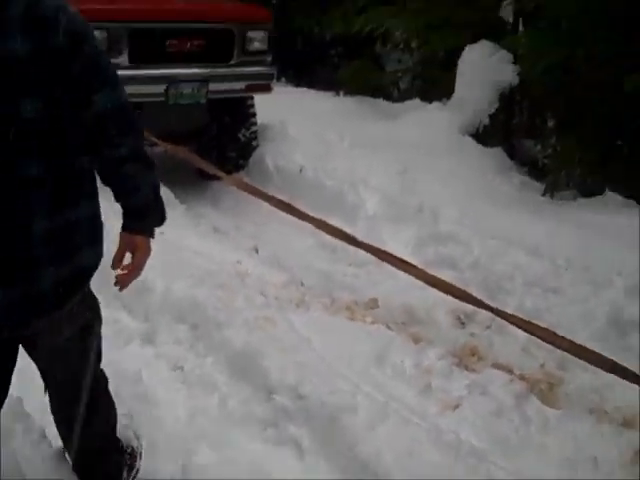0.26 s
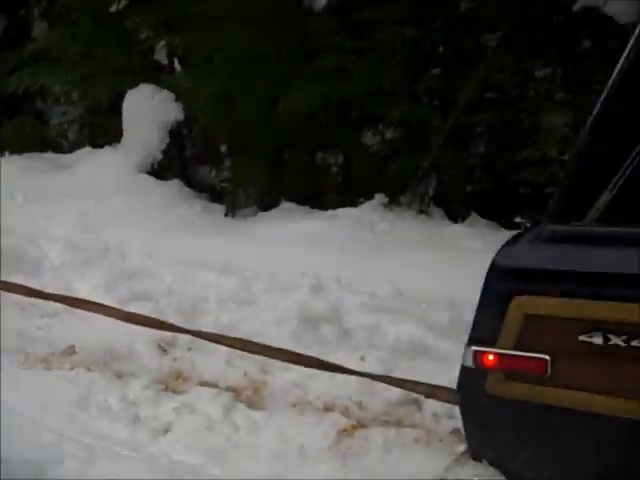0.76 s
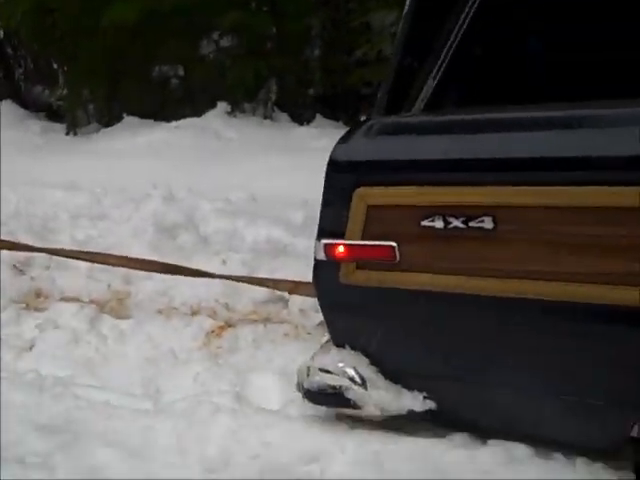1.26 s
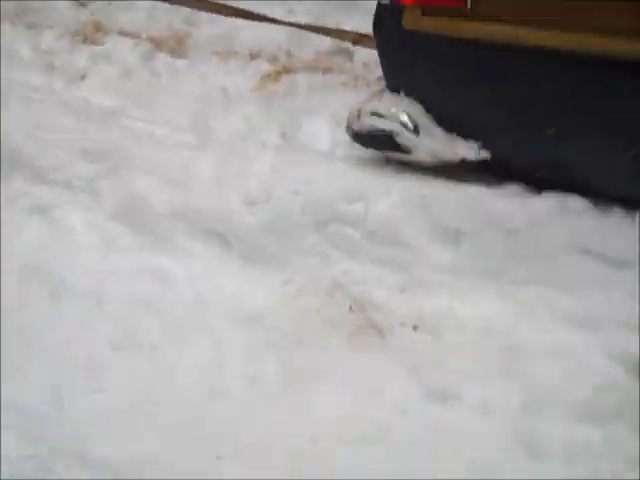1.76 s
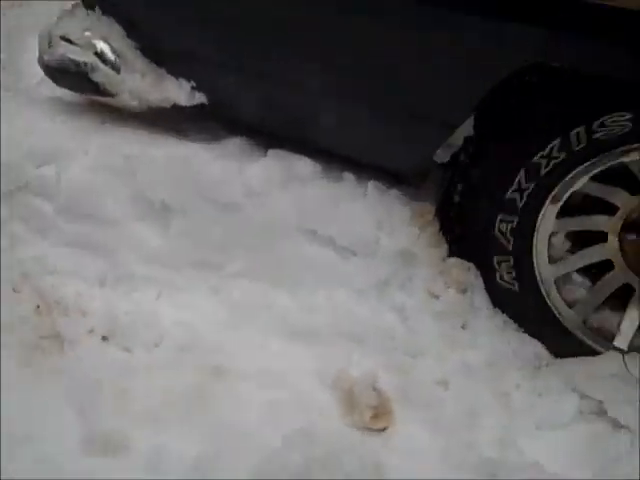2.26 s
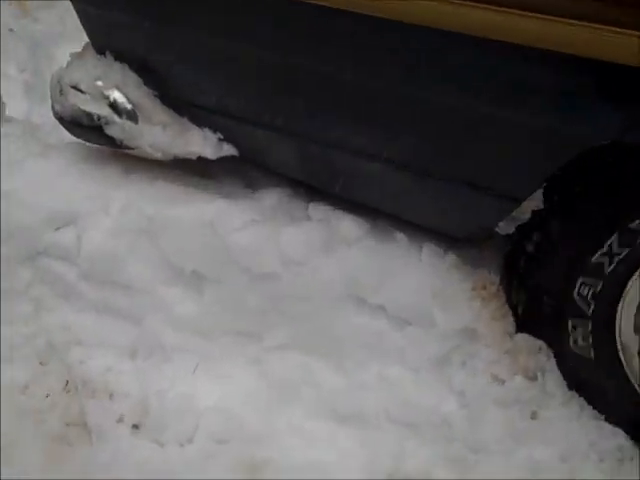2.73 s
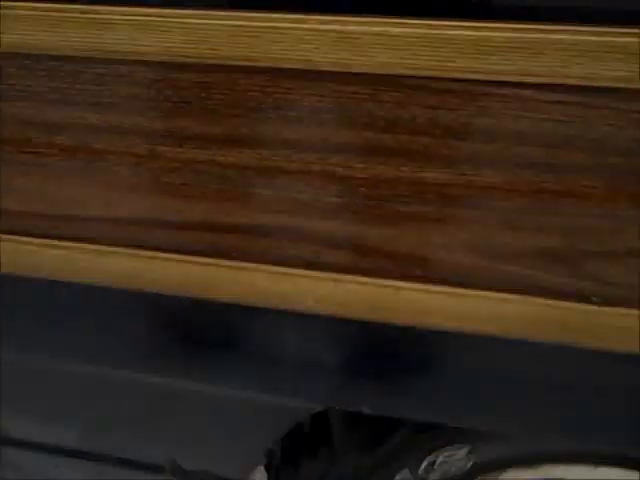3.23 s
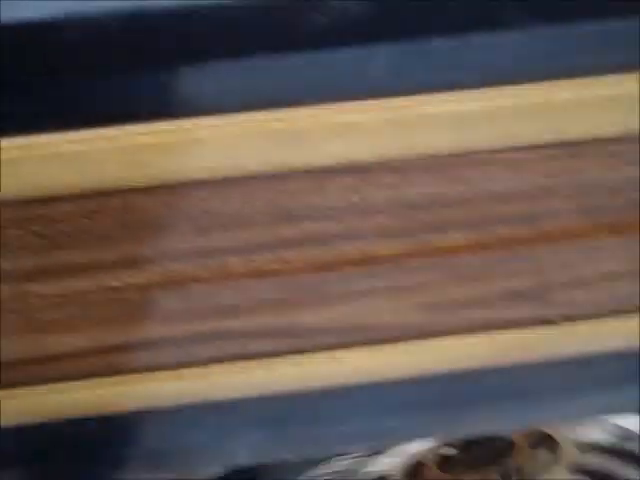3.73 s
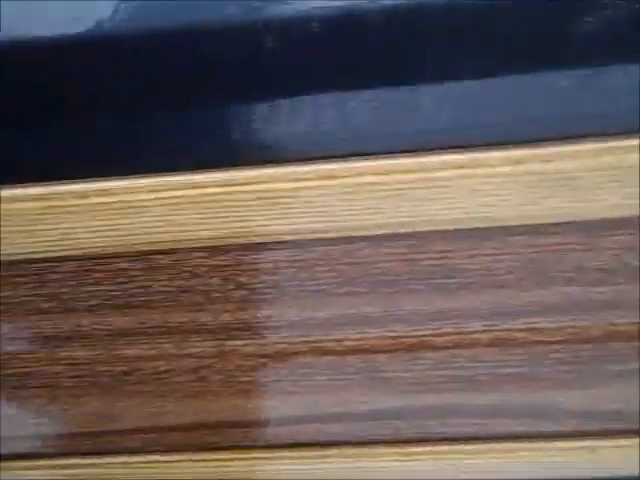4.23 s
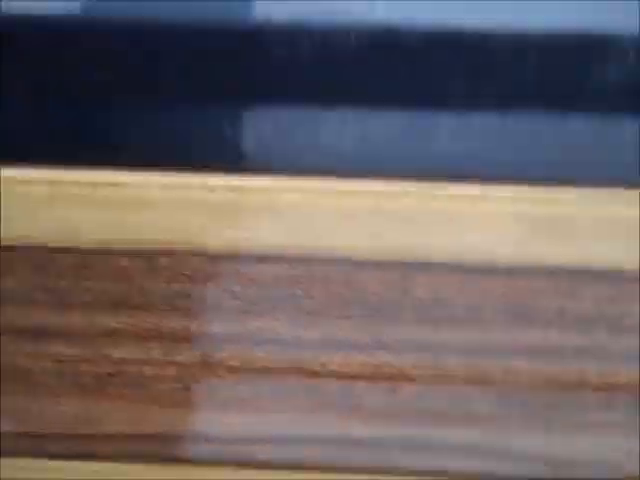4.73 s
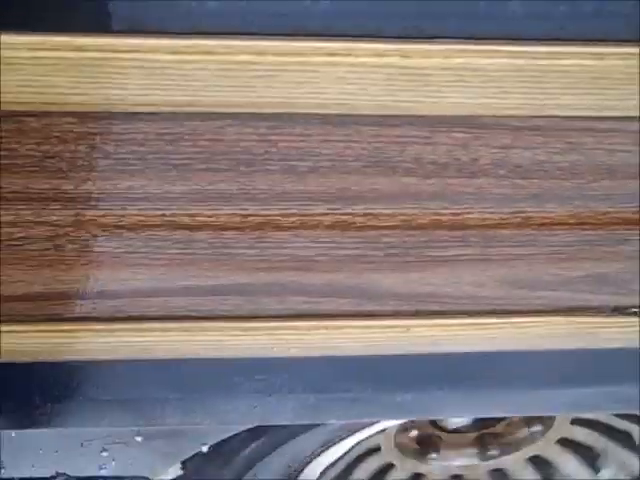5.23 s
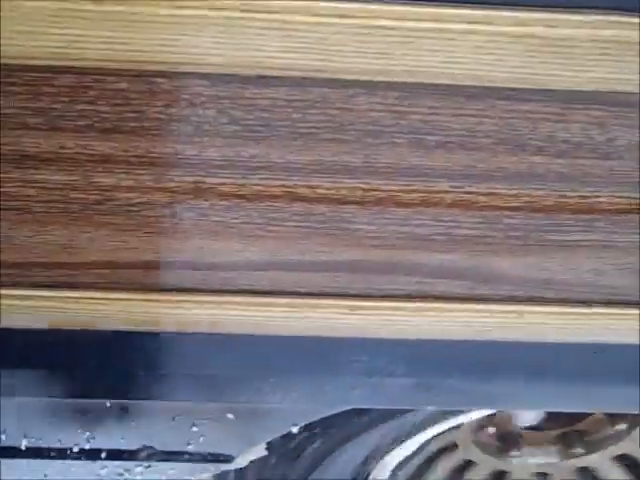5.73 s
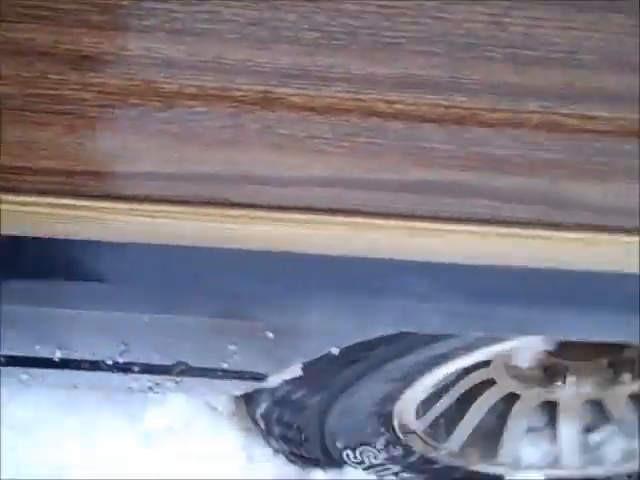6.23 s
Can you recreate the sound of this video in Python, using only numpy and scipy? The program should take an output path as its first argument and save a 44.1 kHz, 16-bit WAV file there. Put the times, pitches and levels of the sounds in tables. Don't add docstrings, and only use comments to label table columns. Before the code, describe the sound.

A lumpy, deep eight-cylinder fast idle runs without pause outdoors, wrapped in coarse roar and fine gassy hiss. Belt and fan whine is most noticeable in the first second. As the listener moves along the car, low body boom grows and short hisses, crunchy knocks and snow spatter appear. Cheap handheld stereo sound, close and full, pumps whenever the level control drops.

```python
import sys
import numpy as np
from scipy import signal
from scipy.io import wavfile

SR = 44100
rng = np.random.default_rng(int(sys.argv[2]) if len(sys.argv) > 2 else 0)


def gain_from_db(level_db):
    decades = np.asarray(level_db, float) / 20
    return 10 ** decades


def waveform_to_disk(signal):
    frames = np.transpose(np.atleast_2d(signal))
    scaled = np.clip(frames, -1, 1) * 32767
    samples = np.round(scaled).astype(np.int16)
    wavfile.write(sys.argv[1], SR, samples)


N = 286297


def in_time(rows):
    s, *columns = np.transpose(rows)
    return [np.interp(np.arange(N) / SR, s, column) for column in columns]


def at_hz(points, hz):
    table_hz, value = np.transpose(points)
    return np.interp(np.log(hz), np.log(table_hz), value)


def rms_one(x):
    return x / np.sqrt(np.mean(x ** 2) + 1e-20)


def drift(rate_hz):
    r = np.exp(-80 * np.pi * rate_hz / SR)
    slow = signal.lfilter([1], [1, -2 * r, r * r], rng.standard_normal(N // 40 + 2002))
    slow = slow[2000:]
    return np.interp(np.arange(N) / 40, np.arange(len(slow)), rms_one(slow))


def resonance(x, hz, width_hz):
    r = np.exp(-np.pi * width_hz / SR)
    poles = [1, -2 * r * np.cos(2 * np.pi * hz / SR), r * r]
    return signal.lfilter([(1 - r * r) / 2, 0, (r * r - 1) / 2], poles, x)


def one_pole(x, hz):
    r = np.exp(-2 * np.pi * hz / SR)
    return signal.lfilter([1 - r], [1, -r], x)


# frequency in Hz, left-right likeness from 0 to 1.
LIKENESS = [(60, 0.44), (130, 0.72), (290, 0.97), (630, 0.97), (1390, 0.75), (3060, 0.35), (6710, 0.31),
            (14700, 0.04)]
# frequency in Hz, left minus right in dB.
LEAN = [(60, -20), (130, -2.5), (290, 0.5), (630, 0.5), (1390, 0), (3060, 0), (6710, 1), (14700, 64)]


def banded_noise(spectrum, patchy_db):
    lowest, highest = spectrum[0][0], spectrum[-1][0]
    edges = np.geomspace(lowest, highest, int(4 * np.log2(highest / lowest)) + 1)
    out, together = 0, drift(9.7)
    white = rng.standard_normal((2, 2, N))
    for k, (low, high) in enumerate(zip(edges, edges[1:])):
        band = signal.butter(2, [low, high], "band", fs=SR, output="sos")
        mid, side = signal.sosfilt(band, white[k % 2])
        hz = np.sqrt(low * high)
        alike = np.clip(at_hz(LIKENESS, hz), 0, 1)
        flicker_db = patchy_db * (0.79 * together + drift(49))
        gain = gain_from_db(at_hz(spectrum, hz) + flicker_db)
        lean = gain_from_db(at_hz(LEAN, hz) * np.array([[.5], [-.5]]))
        stereo = np.sqrt(1 + alike) * mid + np.sqrt(1 - alike) * side * [[1], [-1]]
        out = out + gain * lean * stereo
    return rms_one(out)


# time in seconds, firing cycles per second.
SPEED = [(0.0, 10.75), (0.476, 10.322), (0.825, 10.545), (1.091, 10.567), (1.264, 10.115), (1.568, 10.018),
         (1.843, 10.651), (2.245, 10.548), (2.373, 10.842), (2.959, 10.092), (3.148, 10.223),
         (3.961, 10.611), (4.218, 10.684), (5.289, 10.585), (5.576, 10.141), (5.779, 10.635),
         (6.121, 10.611), (6.49, 10.251)]


def crank_speed():
    return in_time(SPEED)[0]


BANK = [0, 1, 1, 0, 1, 0, 0, 1]
STRENGTH = [1, .3, .880, .397, 1.893, .445, .379, 1.290]
FIRST_FIRING = .124
LONGER_PIPE_S = .0012


def firings(uneven, jitter_s):
    speed = crank_speed()
    speed = np.r_[np.full(SR, speed[0]), speed]
    eighths = 8 * (np.cumsum(speed) / SR - speed[0] - FIRST_FIRING)
    at = np.flatnonzero(np.diff(np.floor(eighths))) + 1
    cylinder = np.floor(eighths[at]).astype(int) % len(BANK)
    bank = np.take(BANK, cylinder)
    chance = rng.standard_normal((len(at), 2))
    late_s = jitter_s * chance[:, 0] + LONGER_PIPE_S * bank
    at = np.clip(at + (late_s * SR).astype(int), 0, N + SR - 1)
    clicks = np.zeros((2, N + SR))
    clicks[bank, at] = np.take(STRENGTH, cylinder) * (1 + uneven * chance[:, 1]) * SR / speed[at]
    return clicks


def puffs(clicks, other_bank, smooth_hz, depth):
    gas = clicks[0] + other_bank * clicks[1]
    gas = one_pole(one_pole(gas, smooth_hz), smooth_hz)[SR:]
    return rms_one(1 + depth * (gas / gas.mean() - 1))


# time in seconds, level in dB.
LOAD = [(0, -11), (.2, -10), (.45, -11), (.8, -10.5), (1.0, -10.5), (1.6, -11), (2.0, -9.5), (2.2, -11.5),
        (2.4, -10), (3.1, -11), (3.6, -11.5), (3.8, -11), (4.2, -10.5), (5.2, -10), (5.45, -12.5),
        (6.0, -10.5), (6.4, -12)]


def engine_load():
    return in_time(LOAD)[0]


# time in seconds, level in dB.
HISS = [(0, -38.5), (.3, -42.1), (.8, -43.5), (1.4, -41.5), (1.7, -43.5), (2.0, -41), (2.2, -43),
        (2.85, -39.5), (3.2, -41), (3.4, -41.5), (3.7, -42.5), (3.85, -39), (4.1, -40.5), (4.4, -39),
        (5.5, -40), (5.7, -41.5), (5.85, -40), (6.49, -42.5)]
# time of the top in seconds, rise in dB.
SLIPS = [
    (1.1, 2.5),
    (2.72, 1),
    (3.31, 5),
    (4.2, 6.5),
    (4.58, 4.5),
    (4.94, 2),
    (5.98, 2),
    (6.16, 2),
]
SURGE_S = 0.035


def gas_flow():
    t = np.arange(N) / SR
    surges_db = sum(rise_db * np.exp(-((t - s) / SURGE_S) ** 2) for s, rise_db in SLIPS)
    return in_time(HISS)[0] + surges_db


# time in seconds, level in dB.
BOOM = [(0, -54), (2.5, -32), (3.2, -30), (6.49, -27)]
RUMBLE_DB, RUMBLE_HZ = -38.5, (22, 190)


def rumble():
    band = signal.butter(2, RUMBLE_HZ, "band", fs=SR, output="sos")
    turbulence = rms_one(signal.sosfilt(band, rng.standard_normal(N)))
    boom = resonance(resonance(rng.standard_normal(N), 45.4, 18), 45.4, 18)
    return gain_from_db(RUMBLE_DB) * turbulence + gain_from_db(in_time(BOOM)[0]) * rms_one(boom)


# multiple of the firing cycle, width in Hz, start in seconds, end in seconds, level in dB.
HUMS = [(25.8, 5.5, 0.22, 1.2, -35.5), (31.77, 28, .02, 1.2, -41), (26.5, 23, .01, 0.26, -44.5),
        (73.8, 6.2, .17, .23, -38.5), (68.9, 14, 1.12, 1.23, -42), (61.8, 13, 0.63, 1.23, -45.5),
        (68.9, 8.5, 2.23, 2.27, -43), (52.96, 11, 3.57, 6.4, -43), (44.4, 15, 5.3, 7, -46.5),
        (40.4, 11, 3.9, 5.8, -48), (166.7, 220, .01, 2.6, -54)]
FADE_SHARE, FADE_DB = 0.41, 16
SHORTEST_FADE_S = .07


def hums():
    angle = 2 * np.pi * np.cumsum(crank_speed()) / SR
    t, out = np.arange(N) / SR, 0
    for order, width_hz, start, end, level_db in HUMS:
        outside_s = np.maximum(np.maximum(start - t, t - end), 0)
        fade_db = FADE_DB * outside_s / (SHORTEST_FADE_S + FADE_SHARE * (end - start))
        tone = drift(width_hz) * np.cos(order * angle) + drift(width_hz) * np.sin(order * angle)
        out = out + gain_from_db(level_db - fade_db) * tone
    return out


# start in seconds, length in seconds, level in dB, centre in Hz, width in Hz.
SPRAYS = [
    (3.28, 0.055, -45, 5000, 9000),
    (3.776, 0.035, -42, 6500, 7000),
    (4.152, 0.085, -46, 6500, 9000),
    (4.293, 0.063, -44, 3000, 1200),
    (4.54, 0.032, -60, 7000, 9000),
    (5.36, 0.023, -46, 6500, 7000),
    (6.14, .04, -50, 13000, 1500),
]


def sprays():
    out = np.zeros((2, N))
    for s, length_s, level_db, hz, width_hz in SPRAYS:
        share = np.arange(round(length_s * SR)) / (length_s * SR)
        shower = rms_one(resonance(rng.standard_normal((2, len(share))), hz, width_hz))
        i = round(s * SR)
        out[:, i:i + len(share)] += gain_from_db(level_db) * shower * np.sin(np.pi * share ** 0.89)
    return out * gain_from_db(np.array([[3.0], [-3.0]]))


# time in seconds, peak in dB, centre in Hz, 60 dB decay in seconds.
KNOCKS = [(0.729, -65, 724, 0.087), (1.208, -46, 716, 0.048), (2.273, -39, 860, 0.03),
          (2.523, -38, 821, 0.04), (3.038, -45, 740, 0.04), (3.689, -28.5, 836, 0.032),
          (4.162, -37, 703, 0.091), (4.274, -42, 900, 0.034), (4.705, -40, 600, 0.015),
          (4.75, -36, 790, 0.023), (4.932, -35, 700, 0.025), (5.05, -23.5, 880, 0.038),
          (5.317, -35, 800, 0.018), (5.48, -34.5, 824, 0.25), (6.088, -54, 753, 0.04)]


def knocks():
    out, t = np.zeros(N), np.arange(SR // 8) / SR
    dull = signal.butter(4, 1900, fs=SR, output="sos")
    for s, peak_db, hz, t60 in KNOCKS:
        shape = (1 - np.exp(-t / 0.0086)) * gain_from_db(-60 * t / max(t60, .01))
        noise = 4.0 * rng.standard_normal(len(t)) * shape
        ring = np.sin(2 * np.pi * hz * t) * shape
        crunch = .6 * resonance(noise, hz, .6 * hz) + .13 * resonance(noise, 1.7 * hz, .9 * hz)
        burst = signal.sosfilt(dull, .6 * ring + crunch)
        i = round((s - .004) * SR)
        out[i:i + len(t)] += gain_from_db(peak_db + 5.0) * burst / np.abs(burst).max()
    return out


# frequency in Hz, density in dB per Hz.
JET = [(2240, -25), (3800, -4.5), (4340, -3.5), (5850, 12.5), (7220, 7.5), (9890, -21.0), (13600, -36.5),
       (14200, -33), (15000, -22)]
LIP_HZ, LIP_WIDTH_HZ, LIP_GAIN = 7420, 230, 0.84


def hiss(clicks, flow_db):
    jet = gain_from_db(flow_db) * puffs(clicks, 0.25, 72, 0.073) * banded_noise(JET, patchy_db=2.0)
    return jet + LIP_GAIN * resonance(jet, LIP_HZ, LIP_WIDTH_HZ)


# frequency in Hz, density in dB per Hz.
RUSH = [(590, -7.5), (1000, -27), (1130, -49), (1490, 0.5), (1720, 6), (3430, 3), (4800, 3), (6240, -35),
        (10600, -120)]
RUSH_DB, RUSH_WITH_LOAD, RUSH_WITH_FLOW, RUSH_LOSS_DB_S = -44, .2, .7, 0.7


def rush(clicks, load_swing_db, flow_swing_db):
    level_db = RUSH_DB + RUSH_WITH_LOAD * load_swing_db + RUSH_WITH_FLOW * flow_swing_db
    level_db = level_db - RUSH_LOSS_DB_S * np.arange(N) / SR
    return gain_from_db(level_db) * puffs(clicks, 1.0, 59, 0.057) * banded_noise(RUSH, patchy_db=1.14)


# frequency in Hz, density in dB per Hz.
ROAR = [(140, -8.5), (235, -2.5), (275, -8), (377, -8.5), (547, -10), (673, -12), (822, -11.5), (976, -17),
        (1180, -30), (1300, -24.5), (1690, -56), (2860, -120)]
ROAR_DB, ROAR_WITH_LOAD, ROAR_WITH_FLOW = -33, 0.2, 0.36


def roar(clicks, load_swing_db, flow_swing_db):
    level_db = ROAR_DB + ROAR_WITH_LOAD * load_swing_db + ROAR_WITH_FLOW * flow_swing_db
    return gain_from_db(level_db) * puffs(clicks, 0.34, 70, 0.022) * banded_noise(ROAR, patchy_db=-0.5)


BARK_DB, BARK_HZ = -50.5, (300, 900)


def bark(clicks):
    band = signal.butter(2, BARK_HZ, "band", fs=SR, output="sos")
    return gain_from_db(BARK_DB) * rms_one(signal.sosfilt(band, clicks.sum(axis=0))[SR:])


# frequency in Hz, width in Hz, gain with polarity.
PIPES = [
    [(46.9, 17.2, -.106), (103.9, 14, .130), (162.4, 16.6, -.386)],
    [(35, 14, -.016), (99.5, 24.7, -.156), (148.2, 14, -.147)],
]
# frequency in Hz, width in Hz.
SILENCER = [(82.2, 29.8), (170, 14)]
# time in seconds, low chamber gain, high chamber gain.
CHAMBERS = [(.9, .0835, .1346), (2.3, .0918, .1015), (3.8, .0868, .0825), (5.4, .0912, .0662)]
MOUTH_HZ, BAFFLE_HZ = 45.2, 186.2


def throb(clicks):
    out = np.zeros(N + SR)
    for bank, pipe in zip(clicks, PIPES):
        for hz, width_hz, gain in pipe:
            out += gain * resonance(bank, hz, width_hz)
    for (hz, width_hz), heard in zip(SILENCER, in_time(CHAMBERS)):
        heard = np.r_[np.full(SR, heard[0]), heard]
        out += resonance(clicks.sum(axis=0) * heard, hz, width_hz)
    for _ in range(2):
        out = out - one_pole(out, MOUTH_HZ)
    baffles = signal.butter(6, BAFFLE_HZ, fs=SR, output="sos")
    return signal.sosfilt(baffles, out)[SR:]


def scene():
    load_db, flow_db = engine_load(), gas_flow()
    swings_db = load_db - load_db.mean(), flow_db - flow_db.mean()
    clicks = firings(uneven=.035, jitter_s=.00007)
    body = gain_from_db(load_db) * throb(clicks) + rumble() + bark(clicks)
    body = body + (one_pole(body, 80) - 0.17 * one_pole(body, 320)) * [[-.45], [.45]]
    exhaust = roar(clicks, *swings_db) + rush(clicks, *swings_db) + hiss(clicks, flow_db)
    return body + exhaust + hums() + knocks() + sprays()


# time in seconds, depth in dB.
DUCKS = [(0.175, 8), (0.648, 5.5), (1.318, 4.5), (1.40, 2.5), (1.618, 10.5), (2.287, 12), (2.852, 6),
         (3.05, 13.5), (3.725, 8), (4.39, 2.5), (4.571, 8.5), (4.764, 6.5), (4.947, 15.5), (6.185, 8),
         (6.473, 8.5)]
HOLD_S, RELEASE_DB_S, ATTACK_S = 0.032, 52, 0.0047


def gain_control():
    t, gain_db = np.arange(N) / SR, np.zeros(N)
    for s, depth_db in DUCKS:
        climb_db = RELEASE_DB_S * np.maximum(t - s - HOLD_S, 0) - depth_db
        gain_db = np.minimum(gain_db, np.where(t >= s - ATTACK_S, climb_db, 0))
    return one_pole(gain_from_db(gain_db) - 1, 1 / (2 * np.pi * ATTACK_S)) + 1


def roll_off(x):
    return signal.sosfilt(signal.butter(12, 15320, fs=SR, output="sos"), x)


SELF_NOISE_DB, CUTOFF_HZ = -66, 14200


def record(dry):
    self_noise = gain_from_db(SELF_NOISE_DB) * rng.standard_normal(dry.shape) * [[1], [.3]]
    top_cut = signal.ellip(14, .3, 60, CUTOFF_HZ, fs=SR, output="sos")
    mix = signal.sosfilt(top_cut, dry * gain_control() + self_noise)
    return roll_off(mix)


dry = scene()
out = record(dry)
waveform_to_disk(out)
```